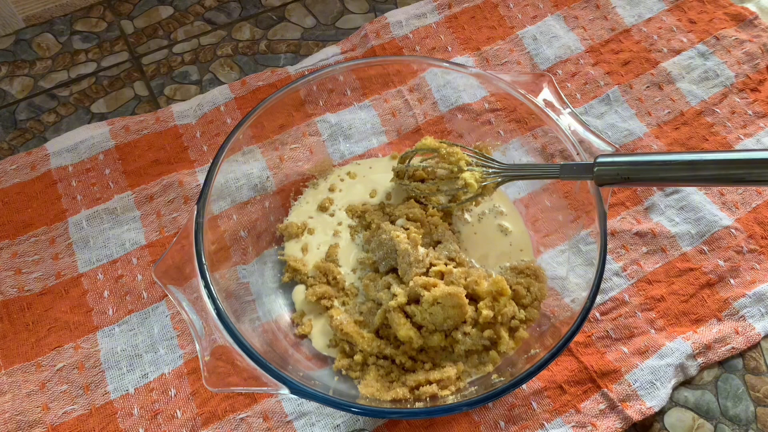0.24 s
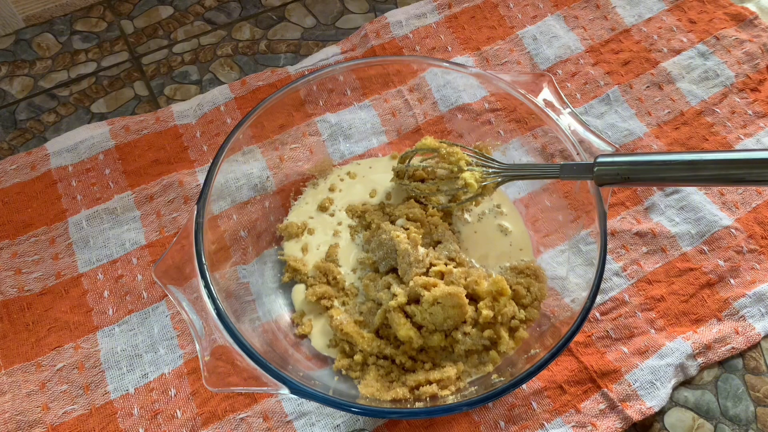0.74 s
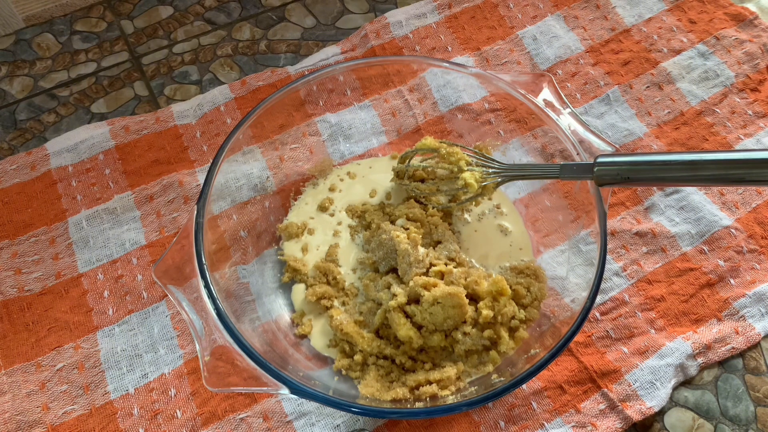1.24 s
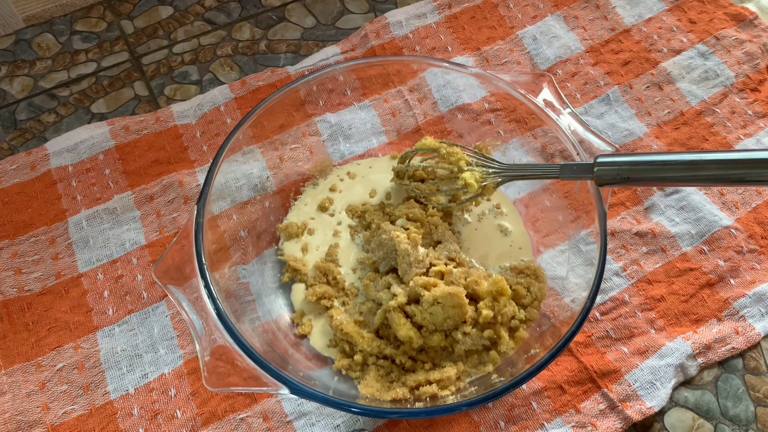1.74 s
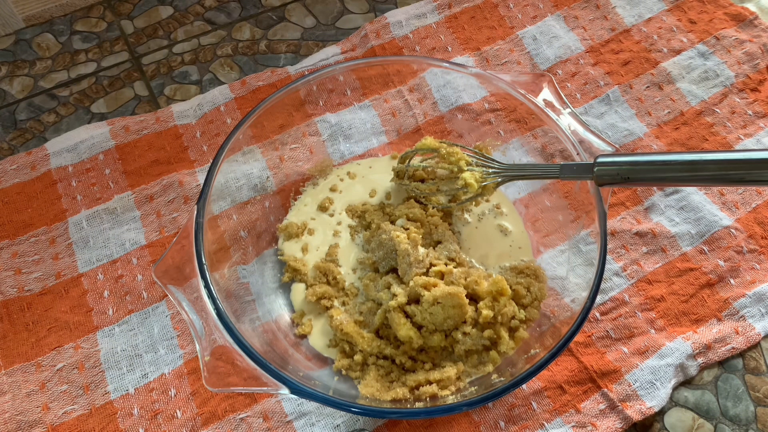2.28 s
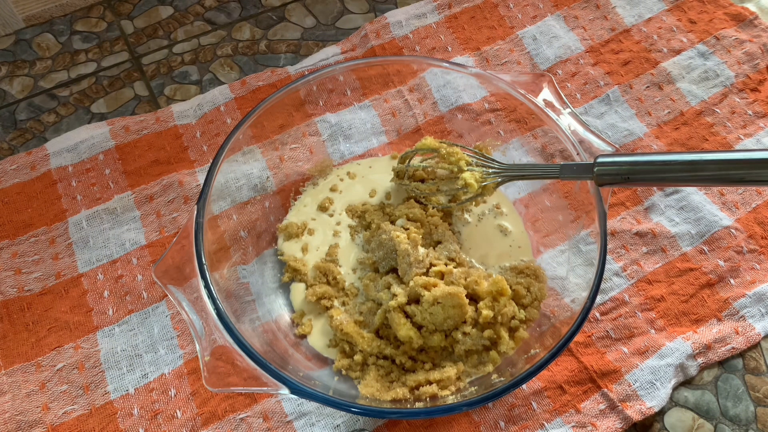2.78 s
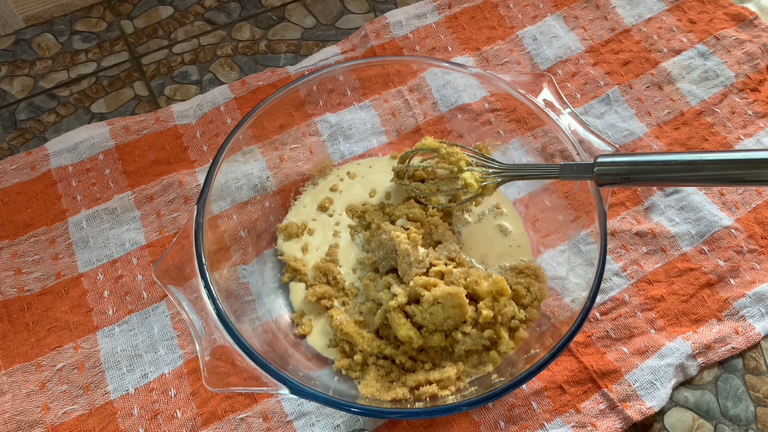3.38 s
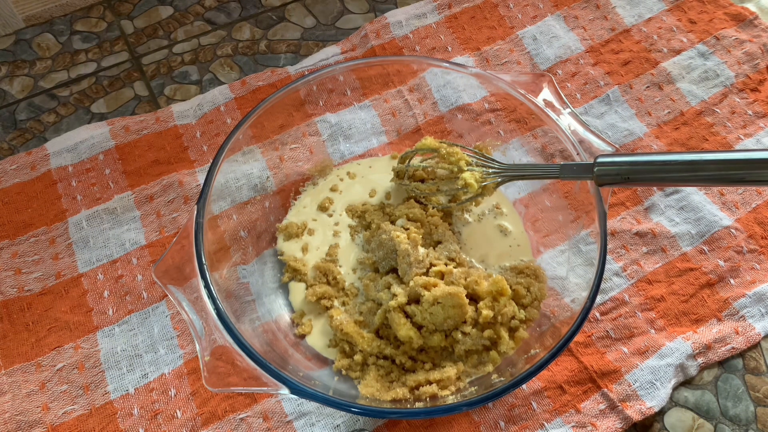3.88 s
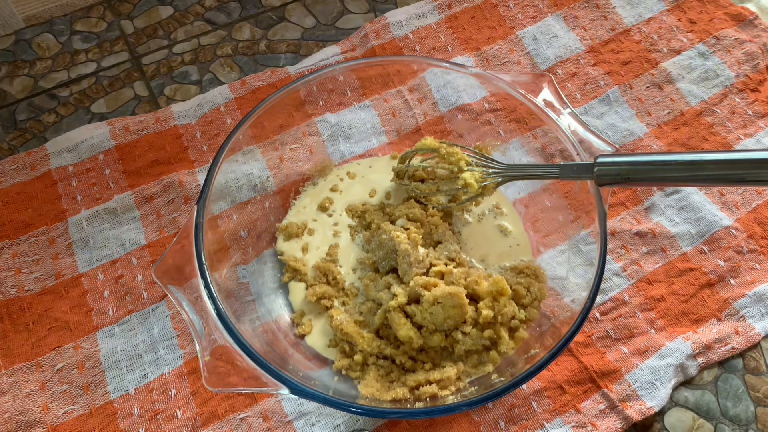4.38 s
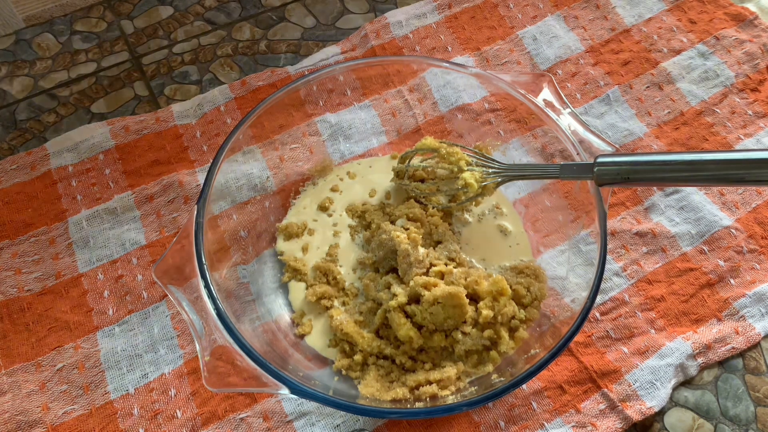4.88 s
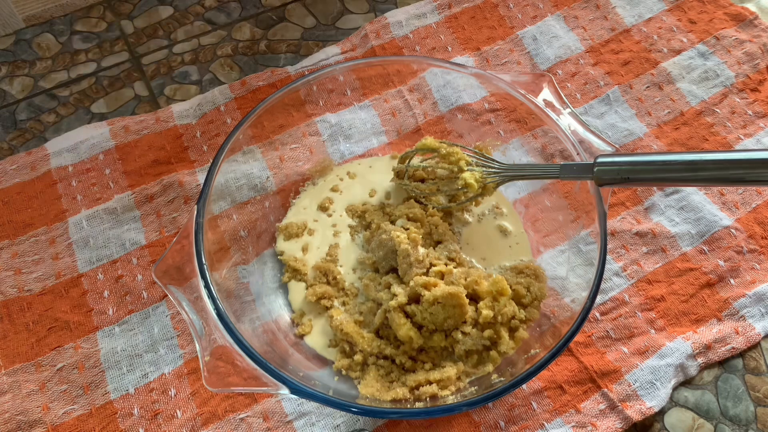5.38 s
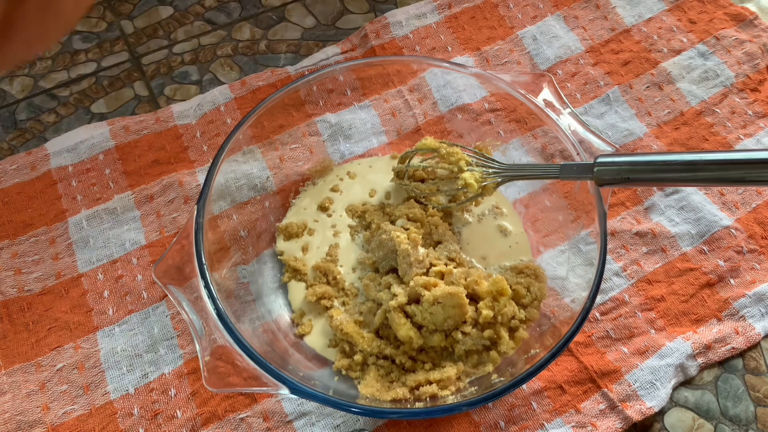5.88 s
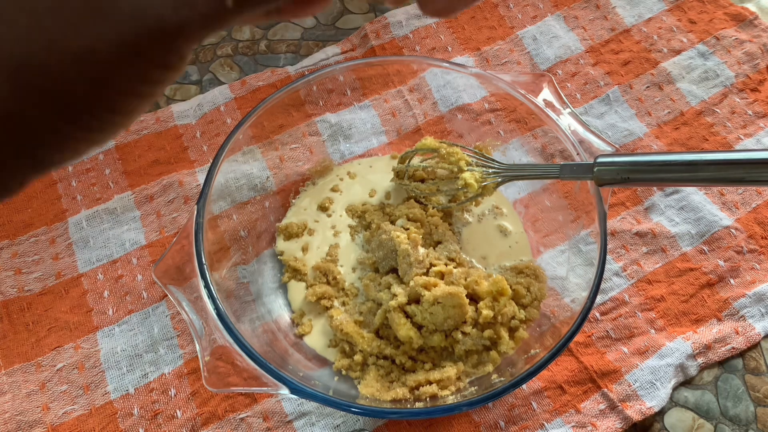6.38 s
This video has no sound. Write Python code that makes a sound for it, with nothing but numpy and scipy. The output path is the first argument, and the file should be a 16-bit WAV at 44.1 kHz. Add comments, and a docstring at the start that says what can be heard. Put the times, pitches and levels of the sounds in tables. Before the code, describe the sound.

Soft cloth strokes and dull knocks over faint room hum, one loud cupboard bang with a catch click, more wiping, then near ticks and crackle.

```python
"""A live, hard-walled kitchen heard from above a mixing bowl, over faint room noise, mains hum and a whirr.
From the start hands are wiped on a cloth across the room: strokes of coloured noise follow the hand's speed.
Soft thuds of decaying noise and a judder of repeated wooden knocks come next, then a low sine drone swells.
A cupboard door bangs as noise bursts, rings as decaying modes and snaps shut with a click of its catch.
Last, a hand returns near the microphone: small ticks, each a short note under a noise crack, and crackle."""
import sys
import numpy as np
from scipy import signal
from scipy.fft import rfft, irfft, next_fast_len
from scipy.io import wavfile
from scipy.ndimage import uniform_filter1d, map_coordinates

SR = 44100
rng = np.random.default_rng(int(sys.argv[2]) if len(sys.argv) > 2 else 0)


def bounce(signal):
    """Save signal as a 16-bit WAV file at the path given by the first command-line argument."""
    frames = np.transpose(np.atleast_2d(signal))
    limited = np.clip(frames, -1, 1)
    pcm = np.round(limited * 32767).astype(np.int16)
    wavfile.write(sys.argv[1], SR, pcm)


N = 292383

# How the room holds sound. Each row: frequency in Hz, time to fall 60 dB in seconds.
ROOM_DECAY = [(100, 0.79), (300, 0.56), (700, 0.65), (2000, 0.71), (5000, .57), (13000, .43)]
# The two microphone ports. Each row: frequency in Hz, likeness from 0 to 1, left's phase lead in radians.
MIC_PORTS = [(60, 1, 0.5), (249, 0.92, 0.83), (550, 0.01, 0.32), (960, 0, 0), (1675, 0.7, 1), (2656, .3, 3),
             (3540, 0.3, 2), (4210, 0.6, 2), (7450, 1, 7.5), (9730, 1, 2.5), (12980, 0.8, 21.5),
             (14700, .7, 4.5)]
# Colour of the room noise. Each row: frequency in Hz, relative level in dB per Hz.
AIR_COLOUR = [(20, -41.5), (36, -8), (62, 2), (100, -5.5), (155, -8.5), (250, -17.5), (420, -18.5),
              (580, -26.5), (1000, -28), (2100, -30), (2600, -33.5), (6500, -37.5), (9000, -53.5),
              (14000, -44.5)]
# Resonances of an appliance's faint whirr. Each row: frequency in Hz, width in Hz, relative level in dB.
WHIRR_MODES = [(151, 12, -2), (420, 34, -10.5), (737, 49, -13), (1590, 93, -21), (2070, 140, -20)]
# Colour of the wiped cloth. Each row: frequency in Hz, relative level in dB per Hz.
CLOTH_COLOUR = [(150, -23.5), (400, -15), (700, -13), (1100, -7), (1500, -4.5), (2000, -2), (2600, -2),
                (3400, -3), (5000, -6.5), (7000, -5), (9000, -15), (12500, -8), (14000, -15.5)]
# Strokes of the cloth. Each row: start in seconds, speeding up in seconds, slowing down in seconds,
# rub level in dB before trim and lingering, hiss over the rub in dB, fine top over the hiss in dB,
# hollow of the hand in Hz.
CLOTH_STROKES = [(0, 0.0057, 0.16, -59, -6.5, 0, 1970), (.11, 0.013, 0.16, -55.5, -1, -2.5, 1980),
                 (.3, 0.069, .16, -70, -3, 1, 1980), (.73, 0.022, 0.034, -61, -3, -13, 1800),
                 (0.989, 0.044, 0.059, -48, -4, 1.5, 1700), (1.18, 0.1, 0.091, -50, -2, .5, 2050),
                 (1.489, 0.013, 0.3, -59, -3.5, 0.5, 2700), (1.778, 0.01, 0.15, -56.5, -9.5, -4, 1590),
                 (1.88, .13, .1, -57.5, -2, -3, 2400), (2.158, 0.048, 0.082, -44.5, -0.5, -6, 1930),
                 (3.59, 0.1, 0.1, -49.5, -2.5, 1.5, 1830), (3.919, 0.049, 0.047, -45, -7.5, -1.5, 1930),
                 (4.14, 0.082, 0.089, -48.5, -1.5, 1, 1870), (4.21, 0.16, 0.089, -40, -3, 1.5, 1880),
                 (4.689, 0.053, 0.066, -52.5, 0.5, 3.5, 2010), (4.96, 0.023, 0.093, -57, 1, 9.5, 2104),
                 (5.23, 0.086, 0.29, -56, -6.5, 0, 1830)]
# Shifts of clothes and feet. Each row: middle in seconds, half length in seconds, level in dB.
SHIFTS = [(.05, 0.29, -59.5), (.64, 0.082, -55.5), (1.05, 0.19, -59.5), (2.3, 0.17, -61),
          (2.85, 0.43, -66.5), (3.8, .5, -64), (5.15, 0.26, -61), (5.62, 0.26, -62)]
# Colour of those shifts. Each row: frequency in Hz, relative level in dB per Hz.
SHIFT_COLOUR = [(80, -13.5), (200, -0.5), (450, -0.5), (800, 0), (1300, -10), (2200, -15.5), (4000, -31.5)]
# Soft thuds. Each row: start in seconds, level in dB before trim, brightness from 0 to 1.
THUD_HITS = [(.694, -39.5, 0.18), (.745, -47, 0.57), (.763, -48, 0.27), (.79, -51, 0.13), (1.649, -48.5, 1),
             (1.68, -49, 0.87), (3.95, -51, 1)]
# Colour of a thud's boom and the judder's room. Each row: frequency in Hz, relative level in dB per Hz.
BOOM_COLOUR = [(50, -30), (90, -1), (190, -1), (340, 6), (460, -6), (700, -5), (950, -35), (1700, -16),
               (3400, -27.5), (5000, -39), (12000, -71)]
# Colour of a thud's scuff. Each row: frequency in Hz, relative level in dB per Hz.
SCUFF_COLOUR = [(76, -15), (130, 1.5), (490, -1.5), (680, -0.5), (839, -7), (1080, -6.5), (3000, -23),
                (3900, -68), (6600, -120)]
# Resonances of the juddering wood. Each row: frequency in Hz, relative level in dB.
WOOD_MODES = [(185, -17.5), (345, -5.5), (560, -1.5)]
# Swells of the low drone. Each row: start in seconds, length in seconds, level in dB before trim.
DRONE_SWELLS = [(1.202, .3, -58), (1.61, 0.71, -48.5), (2.267, 0.34, -45), (2.79, 0.33, -45),
                (3.04, 0.57, -48.5), (3.557, .55, -55.5), (5.054, 0.33, -50.5)]
# The door panel meets its frame. Each row: time in seconds, level in dB before trim.
FRAME_BANGS = [(2.988, -8), (2.9928, -10), (3.0031, -13)]
# Colour of a bang. Each row: frequency in Hz, relative level in dB per Hz.
BANG_COLOUR = [(40, -46), (110, -18), (220, -18.5), (330, -11.5), (480, -0.5), (650, 0.5), (900, -3.5),
               (1200, -6.5), (1600, -12), (2200, -16.5), (3200, -20), (6000, -28), (9000, -34),
               (14000, -34)]
# The catch goes home. Each row: time in seconds, level in dB before trim.
CATCH_SNAPS = [(3.2303, -23.5), (3.235, -23), (3.263, -24.5)]
# Colour of a snap. Each row: frequency in Hz, relative level in dB per Hz.
SNAP_COLOUR = [(40, -40.5), (110, -12.5), (220, -9.5), (350, -7), (560, 2), (760, -8), (1100, -7.5),
               (1700, -6.5), (2500, -12), (4000, -12.5), (6300, -15), (9000, -24.5), (12500, -22),
               (14000, -31.5)]
# Ringing modes of the door panel. Each row: frequency in Hz, level in dB relative to the bang's row,
# level in dB relative to the snap's row, free time to fall 60 dB in seconds.
PANEL_MODES = [(113, -23, -4, 0.64), (419.2, -12.5, -18, 2), (533, -9.5, -2, 0.45),
               (573, -19.5, -11.5, 1.2), (614, -17, -7, 0.94), (657.4, -12.5, -7.5, 0.71),
               (800, -18.5, -24.5, 0.28), (872, 0.5, -4, 0.21), (917, -11.5, -6, 0.59),
               (1194, -19.5, -23, 1.1), (1120, -17.5, -28, 0.84), (1247, -12, -21.5, 0.12),
               (1268, -18, -16, .45), (1595, -17, -15, 0.58), (1920, -23, -21, 0.22),
               (2380, -28.5, -11, 0.42), (2660, -25, -17, 0.58), (3252, -31, -12.5, 0.65),
               (3720, -36, -22.5, 0.415)]
# Colour of the catch's own click. Each row: frequency in Hz, relative level in dB per Hz.
CLICK_COLOUR = [(500, -18), (1500, -2), (3000, 1.5), (6000, -2), (9000, -16), (12500, 10), (14000, 1)]
# Near ticks. Each row: start in seconds, overall level in dB, body note in Hz, crispness in dB.
NEAR_TICKS = [(5.636, -45.5, 1457, -7.5), (5.666, -42, 1457, -5), (5.767, -46, 1600, -5),
              (5.78, -34.5, 1440, -8.5), (6.163, -55, 1550, 3.5), (6.192, -51, 1650, 9.5),
              (6.2463, -35, 1440, 0), (6.284, -40, 1400, 7), (6.299, -52.5, 3000, 10),
              (6.309, -37.5, 3960, -4), (6.356, -37, 1620, -17), (6.384, -36.5, 1035, -24),
              (6.493, -55, 1617, 1), (6.506, -56, 11560, 2)]
# Colour of the ticks and crackle. Each row: frequency in Hz, relative level in dB per Hz.
TICK_COLOUR = [(700, -21), (1400, 0), (4000, -1.5), (5000, -1), (6800, 0.5), (9000, -8.5), (14000, -16)]


def amp(db):
    """Decibels to gain."""
    return 10 ** (np.asarray(db) / 20)


def unit(x):
    """Scaled to rms 1."""
    return x / np.sqrt(np.mean(x ** 2) + 1e-20)


def along(points, hz):
    """Read a curve of (Hz, value) points on a log frequency axis."""
    f, v = np.transpose(points)
    return np.interp(np.log(hz + 1), np.log(f + 1), v)


def wobble(rate):
    """A smooth random curve with rate knots a second."""
    coarse = np.arange(0, N + 32, 32)
    knots = rng.standard_normal(int(N * rate / SR) + 4)
    curve = map_coordinates(knots, [coarse * rate / SR])
    return np.interp(np.arange(N), coarse, curve)


def filtered(x, response):
    """Shape a sound's spectrum by a response of frequency."""
    n = x.shape[-1]
    m = next_fast_len(n + SR // 4)
    return irfft(rfft(x, m) * response(np.fft.rfftfreq(m, 1 / SR)), m)[..., :n]


def add(track, s, sound):
    """Mix a sound in at s seconds."""
    part = track[:, round(s * SR):][:, :sound.shape[-1]]
    part += sound[..., :part.shape[1]]


def ports(hz):
    """How alike a diffuse sound is at the two ports, and its phase between them."""
    f, alike, lead = np.transpose(MIC_PORTS)
    return np.clip(np.interp(hz, f, alike), 0, 1), np.interp(hz, f, lead)


def diffuse(spectrum, size):
    """Coloured stereo noise of rms 1, as the room delivers it to the two ports."""
    m = next_fast_len(size)
    hz = np.fft.rfftfreq(m, 1 / SR)
    alike, lead = ports(hz)
    coloured = rfft(rng.standard_normal((2, m))) * amp(along(spectrum, hz))
    # a shared part and an opposed part set the likeness of left and right
    shared, opposed = coloured * np.sqrt([1 + alike, 1 - alike])
    turn = np.exp(.5j * np.array([lead, -lead]))
    return unit(irfft(np.array([shared + opposed, shared - opposed]) * turn, m)[:, :size])


def blow(spectrum, early_db, early_t60, attack):
    """A distant blow: noise decaying at the room's rate for each pitch, with a faster early burst on top."""
    t = np.arange(SR) / SR
    hz, age, z = signal.stft(diffuse(spectrum, size=len(t)), SR, nperseg=512)
    decay = amp(-60 * age / along(ROOM_DECAY, hz)[:, None])
    tail = signal.istft(z * decay, SR, nperseg=512)[1][:, :len(t)]
    early = amp(early_db - 60 * t / early_t60)
    return tail * (1 + early) * (1 - np.exp(-t / attack))


def swells(rows):
    """Gain of bell-shaped swells, from rows of (middle s, half length s, dB)."""
    t = np.arange(N) / SR
    return np.sqrt(sum(amp(db) ** 2 / (1 + ((t - s) / half) ** 2) ** 2 for s, half, db in rows))


def room_noise(air_db=-59):
    """Steady coloured air noise whose level drifts slightly."""
    return amp(air_db + .7 * wobble(1.5)) * diffuse(AIR_COLOUR, size=N)


def mains_hum(mains_db=-56, mains_hz=50):
    """A mains-frequency sine, a little unsteady in level and phase."""
    t = np.arange(N) / SR
    tone = np.sin(2 * np.pi * mains_hz * t + 0.26 * wobble(3))
    return np.sqrt(2) * amp(mains_db + 0.76 * wobble(4.1)) * tone  # sqrt(2) makes the level an rms


def appliance_whirr(whirr_db=-71):
    """Noise through narrow resonances gives an appliance's faint whirr."""
    def casing(f):
        return sum(amp(db) / (1 + ((f - hz) / width * 2) ** 2) for hz, width, db in WHIRR_MODES)
    return amp(whirr_db) * unit(filtered(rng.standard_normal(N), casing))


def walls(x, wall_db=-15, count=8):
    """Near surfaces add weak delayed copies that comb the sound."""
    delays = rng.uniform(.001, 0.013, count)  # s
    return filtered(x, lambda hz: 1 + amp(wall_db) * sum(np.exp(-2j * np.pi * hz * d) for d in delays))


def patchy(x, depth_db, hollow_db=3, width_octaves=0.27, size=(14, 30)):
    """The colour drifts as folds come into play and the resonant hollow of the cupped hand changes."""
    hz, s, z = signal.stft(x, SR, nperseg=512)
    field = rng.standard_normal(z.shape[1:])
    for axis in (0, 0, 1, 1):  # smooth twice over pitch, twice over time
        field = uniform_filter1d(field, size[axis], axis)
    start, rise, *_, hollow_hz = np.transpose(CLOTH_STROKES)
    centre = np.interp(s, start + rise, hollow_hz)
    octaves = np.log2((hz[:, None] + 1) / centre)
    hollow = hollow_db * np.exp(-(octaves / width_octaves) ** 2)
    return signal.istft(z * amp(depth_db * unit(field) + hollow), nperseg=512)[1][:, :N]


def hump(start, rise, fall):
    """Hand speed: from rest smoothly up to 1 and back to rest."""
    ramp = np.interp(np.arange(N) / SR, start + np.cumsum([0, rise, fall]), [0, 1, 0])
    return np.sin(np.pi / 2 * ramp)


def lingering(power, t60):
    """Power as the room holds it and lets it die away."""
    keep = np.exp(-np.log(10 ** 6) / (t60 * SR))
    return signal.lfilter([1 - keep], [1, -keep], power)


def stroke_gains(speed_law=2.15, rub_t60=0.56, hiss_t60=.52, sheen_t60=0.3):
    """Friction power of rub, hiss and fine top goes as a power of hand speed, then lingers in the room."""
    power = np.zeros((3, N))
    for start, rise, fall, db, hiss_db, top_db, _ in CLOTH_STROKES:
        levels = amp(np.cumsum([db, hiss_db, top_db]))[:, None]  # each stated over the one before
        power += levels ** 2 * hump(start, rise, fall) ** speed_law
    return [np.sqrt(lingering(p, t60)) for p, t60 in zip(power, (rub_t60, hiss_t60, sheen_t60))]


def below(x, edge):
    """The part of a sound under an edge in Hz."""
    return filtered(x, lambda hz: 1 / (1 + (hz / edge) ** 8))


def cloth(rub_db=3, hiss_db=3, split_hz=5000, sheen_hz=10000, grain_db=0.16, surge_db=0.95):
    """Fibres rub, hiss and shed a fine top under each stroke, in three bands that swell with the hand."""
    rub, hiss, sheen = stroke_gains()
    fibres = patchy(walls(diffuse(CLOTH_COLOUR, size=N)), depth_db=2.22)
    low, soft = below(fibres, split_hz), below(fibres, sheen_hz)
    high = (hiss * (soft - low) + sheen * (fibres - soft)) / np.std(fibres - low)
    texture = amp(grain_db * wobble(120) + surge_db * wobble(25))
    return (amp(rub_db) * rub * unit(low) + amp(hiss_db) * high) * texture


def shuffle():
    """Clothes and feet shift dully: soft noise under bell-shaped, fluttering swells."""
    return amp(wobble(25)) * swells(SHIFTS) * diffuse(SHIFT_COLOUR, size=N)


def thuds(boom_db=-3, scuff_db=2):
    """Padded knocks: the dull ones boom, the bright ones scuff."""
    out = np.zeros((2, N))
    for s, db, bright in THUD_HITS:
        boom = amp(boom_db) * blow(BOOM_COLOUR, early_db=10.5, early_t60=0.17, attack=0.0035)
        scuff = amp(scuff_db) * blow(SCUFF_COLOUR, early_db=3, early_t60=0.11, attack=0.0069)
        add(out, s, amp(db) * ((1 - bright) * boom + bright * scuff))
    return out


def judder(start=.6995, slip_hz=176, db=-31, slip_t60=0.02, room_db=-16, count=5):
    """Something wooden sticks and slips a few times as it is nudged, each slip a short resonant knock."""
    out, t = np.zeros((2, N)), np.arange(SR) / SR
    knock = sum(amp(level - 60 * t / slip_t60) * np.sin(2 * np.pi * hz * t) for hz, level in WOOD_MODES)
    slip = knock + amp(room_db) * blow(BOOM_COLOUR, early_db=-4, early_t60=0.091, attack=0.0023)
    for k in range(count):
        add(out, start + k / slip_hz, amp(db) * slip)
    return out


def drone_gain(fade_s=0.11):
    """Every swell of the drone fades in, holds if long enough, and fades out."""
    t = np.arange(N) / SR
    return sum(amp(db) * np.clip(np.minimum(t - s, s + length - t) / fade_s, 0, 1)
               for s, length, db in DRONE_SWELLS)


def drone(drone_hz=82, drone_db=-1):
    """A low sine, wandering a little in phase, that swells and fades."""
    t = np.arange(N) / SR
    tone = np.sin(2 * np.pi * drone_hz * t + .2 * wobble(6))
    return np.sqrt(2) * amp(drone_db) * drone_gain() * tone


def ring(hz, db, t60, waver=0.11):
    """One decaying mode; reflections make it waver a little, differently at each port."""
    t = np.arange(SR) / SR
    knots = rng.standard_normal((2, 2, 31))
    swell, drift = [np.array([np.interp(t, np.linspace(0, 1, len(k)), k) for k in pair]) for pair in knots]
    phase = 2 * np.pi * (hz * t + rng.random()) + 2 * waver * drift
    return amp(db - 60 * t / t60) * (1 + waver * swell) * np.sin(phase) * (1 - np.exp(-t / 0.0017))


def door(bang_db=-8, snap_db=0, ring_db=0, damped_t60=0.3, held_t60=0.69):
    """The panel bangs and chatters, rings freely, and is damped as the catch snaps home."""
    out, free = np.zeros((2, N)), np.zeros((2, N))
    for s, db in FRAME_BANGS:
        add(out, s, amp(db + bang_db) * blow(BANG_COLOUR, early_db=0, early_t60=0.13, attack=0.00042))
    for s, db in CATCH_SNAPS:
        add(out, s, amp(db + snap_db) * blow(SNAP_COLOUR, early_db=-2.5, early_t60=0.15, attack=0.0017))
    (first, first_db), (shut, shut_db) = FRAME_BANGS[1], CATCH_SNAPS[1]
    add(free, first, sum(ring(hz, first_db + ring_db + db, t60) for hz, db, _, t60 in PANEL_MODES))
    # the closed catch shortens the longest rings
    add(out, shut, sum(ring(hz, shut_db + ring_db + db, min(t60, held_t60)) for hz, _, db, t60 in PANEL_MODES))
    since_shut = np.maximum(np.arange(N) / SR - shut, 0)
    out += free * amp(-60 * since_shut / damped_t60)
    return out * amp([[-.7], [.7]])  # a little to the right


def catch(click_db=-23, click_t60=.045):
    """The hard click of the catch arrives straight: a decaying noise burst with no room tail."""
    out, t = np.zeros((2, N)), np.arange(SR // 10) / SR
    add(out, CATCH_SNAPS[0][0], amp(click_db - 60 * t / click_t60) * diffuse(CLICK_COLOUR, size=len(t)))
    return out


def crinkle(spiky_db=4.5, crackle_db=-31.5, spread_s=.04, floor_db=-75):
    """Fine spiky crackle from the first tick onward, thickening around each tick."""
    near = amp(floor_db) * (np.arange(N) / SR > NEAR_TICKS[0][0])
    around = swells([(s, spread_s, db + crisp_db + crackle_db) for s, db, _, crisp_db in NEAR_TICKS])
    return np.hypot(near, around) * unit(diffuse(TICK_COLOUR, size=N) * amp(spiky_db * wobble(400)))


def ticks(body_t60=0.02, crack_t60=0.017, room_db=-14):
    """Small close contacts: a crisp crack over a short hollow note, with fine crackle and a little room."""
    out, t = np.zeros((2, N)), np.arange(SR // 10) / SR
    for s, db, hz, crisp_db in NEAR_TICKS:
        body = amp(-10.5 - 60 * t / body_t60) * np.sin(2 * np.pi * hz * t)
        crack = amp(crisp_db - 4.5 - 60 * t / crack_t60) * diffuse(TICK_COLOUR, size=len(t))
        add(out, s, amp(db) * (body + crack))
    tail = blow(TICK_COLOUR, early_db=-13, early_t60=0.046, attack=0.0038)
    room = signal.fftconvolve(out, tail / np.linalg.norm(tail[0]), axes=1)[:, :N]
    return out + amp(room_db) * room + crinkle()


def scene():
    """Everything in the kitchen, summed."""
    background = room_noise() + mains_hum() + appliance_whirr() + drone()
    hands = cloth() + shuffle() + ticks()
    knocks = thuds() + judder() + door() + catch()
    return background + hands + knocks


def record(dry, ceiling=.95, top_hz=14300):
    """The recorder rounds off the highest peaks and cuts steeply above its band limit."""
    rounded = dry / (1 + np.abs(dry / ceiling) ** 6) ** (1 / 6)
    return filtered(rounded, lambda hz: 1 / (1 + (hz / top_hz) ** 90))


dry = scene()
out = record(dry)
bounce(out)
```